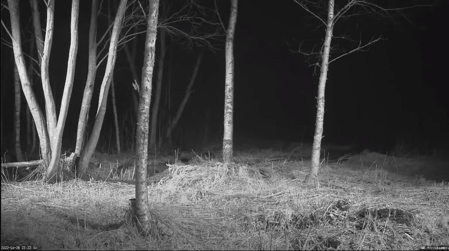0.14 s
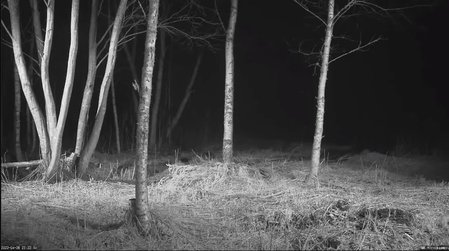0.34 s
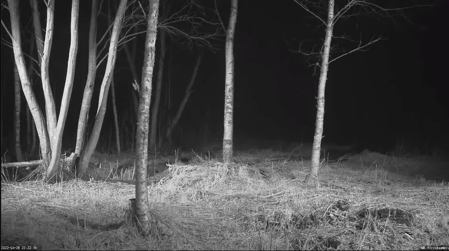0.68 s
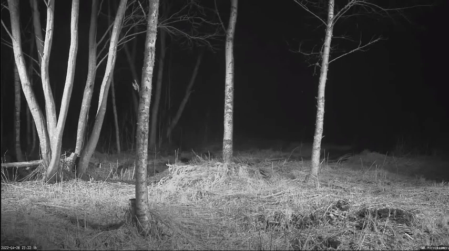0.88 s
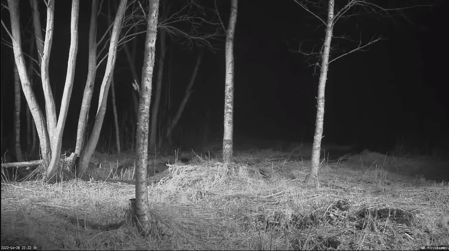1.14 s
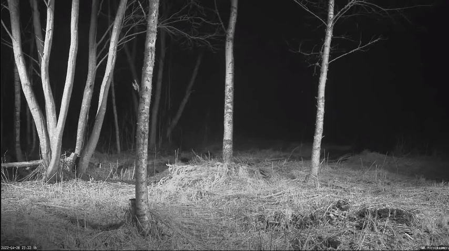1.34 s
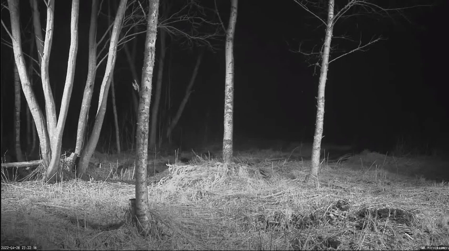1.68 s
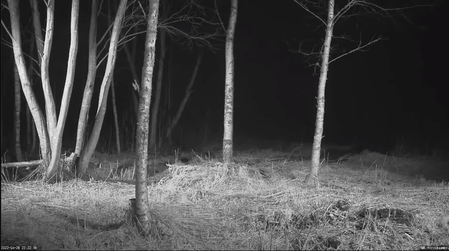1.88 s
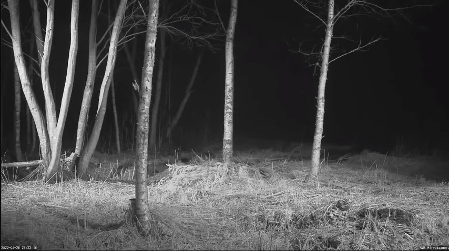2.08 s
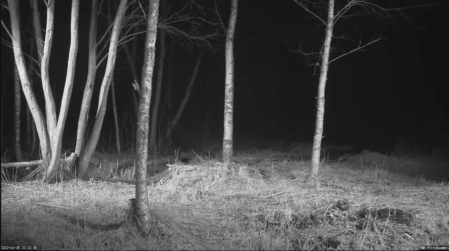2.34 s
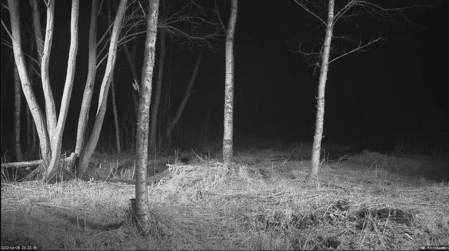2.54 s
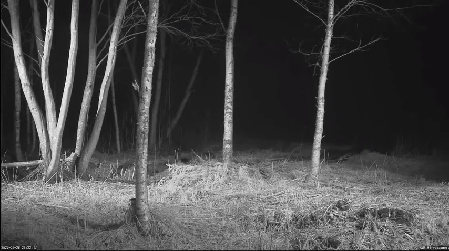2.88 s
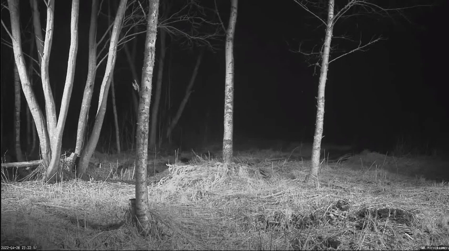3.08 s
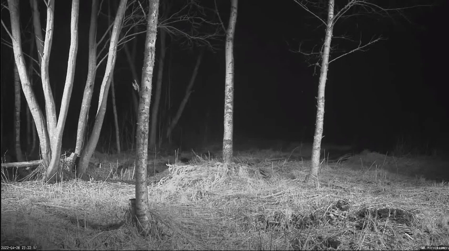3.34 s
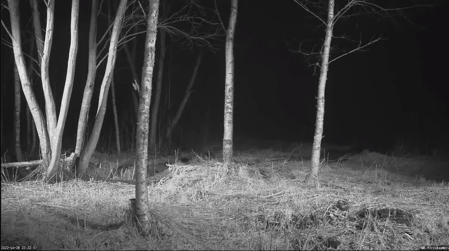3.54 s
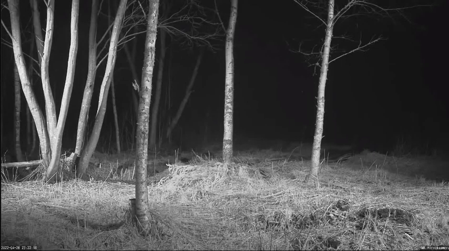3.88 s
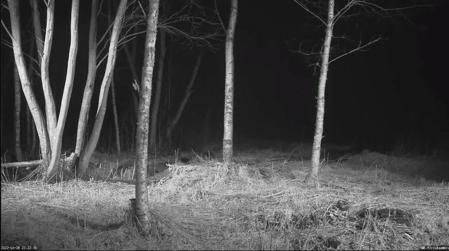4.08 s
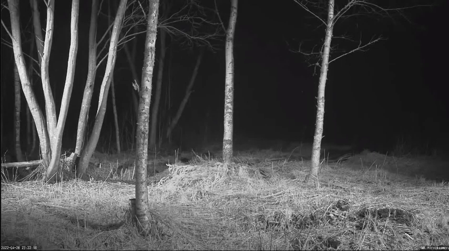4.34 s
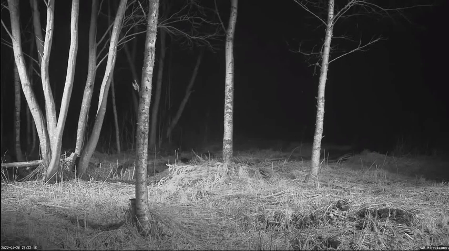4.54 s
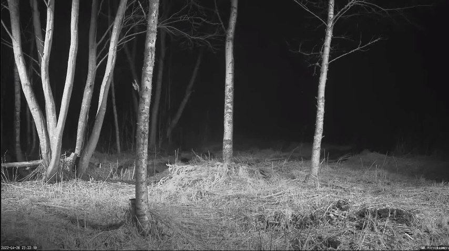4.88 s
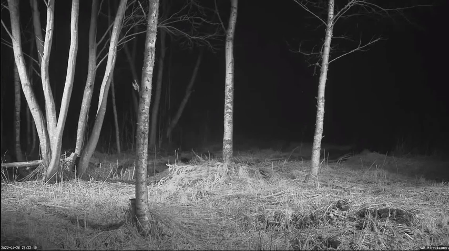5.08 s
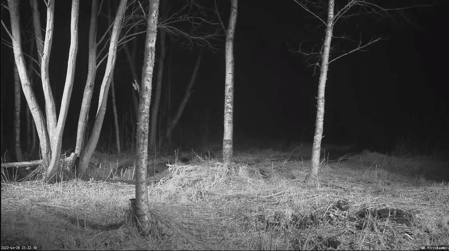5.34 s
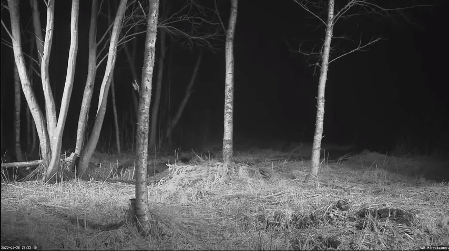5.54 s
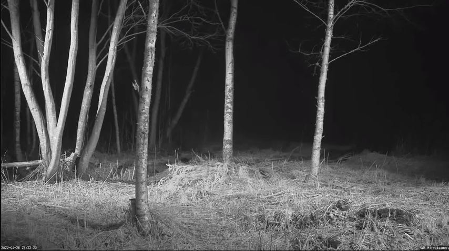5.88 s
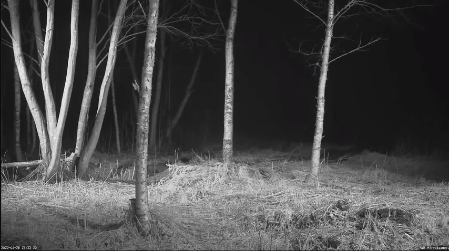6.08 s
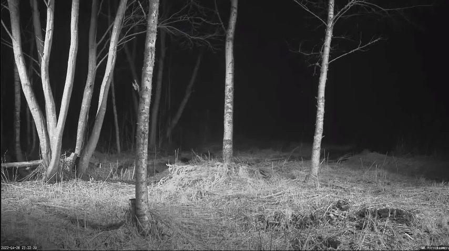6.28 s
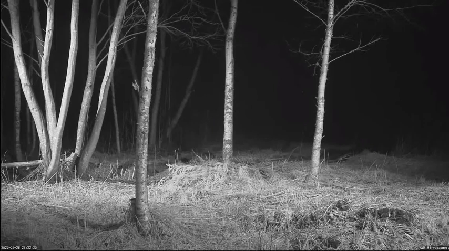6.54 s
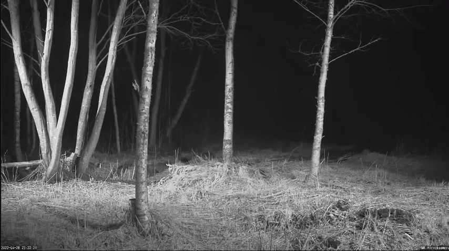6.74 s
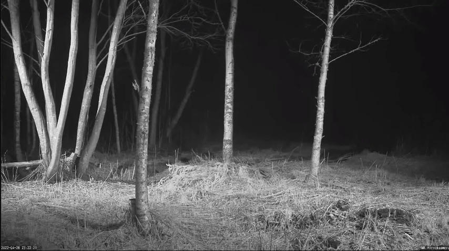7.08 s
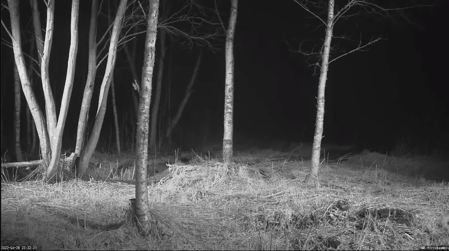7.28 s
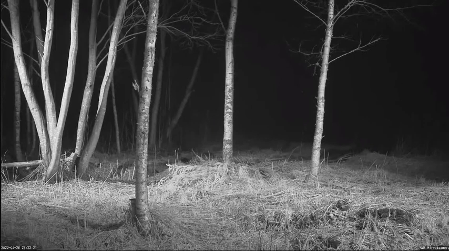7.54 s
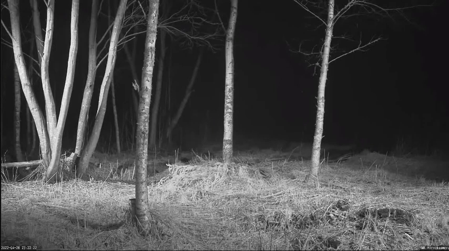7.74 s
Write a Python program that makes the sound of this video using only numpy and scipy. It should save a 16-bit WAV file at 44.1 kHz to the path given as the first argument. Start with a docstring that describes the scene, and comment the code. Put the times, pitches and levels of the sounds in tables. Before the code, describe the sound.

Already in full chorus, several wolves yip and give brief, quavering howls across dark woodland, heard from a fixed outdoor microphone at some distance. Sparse calls build to two abrupt falling squeals around three and three and a half seconds, the strongest cries. Busy yapping follows, with a bright yip past five and a half, a slight thinning, then a last flurry. Distant pack voices, breathy throat air, long woodland echo and very low hiss fill the gaps.

```python
"""A wolf pack choruses in a forest at night: yips, two falling squeals, low howls and thin whines.
Yips, squeals and howls are wavering harmonics weighted by a throat spectrum; whines are near-pure tones.
Yips, howls and whines are single pitch arches; squeals slide down in steps. Air rushes with yips and squeals.
A far part of the pack fills in with random howls. Tree trunks scatter the calls into a long echo;
a faint steady hiss lies underneath."""
import sys
import numpy as np
from scipy import signal
from scipy.fft import rfft, irfft, next_fast_len
from scipy.io import wavfile
from scipy.ndimage import uniform_filter1d, map_coordinates

SR = 44100
rng = np.random.default_rng(int(sys.argv[2]) if len(sys.argv) > 2 else 0)


def write(x):
    x = np.atleast_2d(x).T
    wavfile.write(sys.argv[1], SR, np.round(np.clip(x, -1, 1) * 32767).astype(np.int16))


N = 348831

# Steady background spectrum. Each row: frequency in Hz, relative density in dB per Hz.
HISS_SPECTRUM = [(10, -0.5), (28, 6.5), (60, -1), (120, -5.5), (250, -6), (600, -10), (1500, -46.5),
                 (3000, -27), (5000, -25.5), (8000, -27), (15500, -29.5)]
# Echo decay of the wood. Each row: frequency in Hz, time to fall 60 dB in seconds.
FOREST_DECAY = [(300, 7.7), (1000, 3.14), (2000, 1.2), (4000, 2.18), (8000, 0.43)]
# Far pack loudness. Each row: time in seconds, level in dB before the mix.
PACK_LEVELS = [(0, -26.5), (.66, -35), (1.501, -33.5), (1.902, -27), (2.309, -34.5), (2.599, -33.5),
               (3.13, -33.5), (3.44, -28.5), (3.799, -27), (3.999, -28), (4.701, -28), (5.442, -30.5),
               (5.68, -28.5), (5.99, -32), (6.41, -32.5), (6.901, -33.5), (7.55, -34), (7.91, -28.5)]
# Far pack voice colour. Each row: frequency in Hz, gain in dB.
PACK_COLOUR_DB = [(300, -21.5), (420, -17), (600, -7), (800, -7.5), (1100, 4.5), (1450, 2), (1800, -2),
                  (2200, -15), (2800, -39), (3400, -38), (4200, -35), (5500, -42)]
# Direct path of yips from wolves facing away. Each row: frequency in Hz, gain in dB.
FACING_AWAY = [(1500, 1), (2300, 1), (2900, -5), (4000, -2), (5500, -1.5)]
# Air rushing through the throat. Each row: frequency in Hz, relative density in dB per Hz.
AIR_SPECTRUM = [(1500, -30), (2400, -1), (2900, 3), (3500, -6), (4200, -6.5), (4700, -11), (6500, -17),
                (9000, -27.5)]
# Throat and microphone colour. Each row: frequency in Hz, gain in dB.
THROAT_COLOUR = [(300, -33.5), (420, -27), (500, -18.5), (650, -12), (900, 2.5), (1300, 3.5), (1600, 4.5),
                 (1900, 4), (2200, -4.5), (2450, -15.5), (2670, -16.5), (2800, -23.5), (3050, -19.5),
                 (3400, -38), (4100, -37), (4700, -45), (7000, -69)]
# Thin nasal whistles. Each row: start in seconds, length in seconds, top pitch in Hz,
# level in dB before the mix.
WHINE_NOTES = [(0.125, 0.16, 4830, -79), (1.075, 0.23, 5170, -76.5), (1.773, 0.14, 3985, -68.5),
               (2.49, 0.14, 3610, -77.5), (2.837, 0.12, 5610, -68.5), (2.944, 0.1, 5900, -72),
               (3.592, 0.053, 5890, -69), (3.683, 0.062, 4870, -71.5), (3.789, 0.065, 4000, -70),
               (5.43, 0.075, 5610, -77), (5.605, .2, 4330, -74.5), (6.306, 0.067, 3930, -74),
               (7.336, 0.023, 3970, -60), (7.565, .1, 3390, -71.5), (7.831, .08, 4330, -78)]
# Low notes of the adults. Each row: start in seconds, length in seconds, top pitch in Hz,
# level in dB before the mix, brightness in dB per octave, mouth resonance in Hz.
HOWL_NOTES = [(0, 0.3, 393.7, -38.5, -6, 800), (0, 0.32, 442, -42, -11, 890),
              (0, 0.43, 816, -42, -16, 1520), (.02, 0.52, 566, -51.5, -18, 1230),
              (0.423, .19, 468.5, -41.5, -9.5, 1050), (0.809, .12, 396.7, -41, -14, 1190),
              (.93, 0.17, 417.5, -43, -11.5, 1373), (1.17, 0.33, 415, -45, -9.5, 1280),
              (1.407, 0.12, 683, -39.5, -11.5, 1830), (1.466, 0.23, 649, -45, -11, 1300),
              (1.67, 0.34, 503.6, -38.5, -5.5, 1436), (2.031, 0.34, 530.7, -49, -15.5, 1517),
              (2.523, 0.2, 537.5, -48, -9.5, 1590), (2.719, 0.12, 561.7, -41.5, -5.5, 1500),
              (3.37, 0.081, 644, -36.5, -20.5, 1295), (3.471, 0.08, 559, -33, -2, 1140),
              (3.592, 0.052, 489, -32.5, 2.5, 980), (3.889, 0.16, 513.5, -43.5, -14, 1570),
              (3.904, 0.13, 334, -62, -27, 788), (4.054, 0.056, 655, -35.5, -17.5, 1760),
              (4.153, .17, 436.7, -39, -14, 1303), (4.371, 0.12, 471, -33.5, -5, 1760),
              (4.495, 0.089, 448.6, -40.5, -10, 1410), (5.06, 0.09, 501.8, -31, -9.5, 1570),
              (5.202, 0.08, 533.5, -30, -4, 1580), (5.339, 0.078, 516.4, -35.5, -1, 1100),
              (6.04, 0.06, 315.7, -62.5, -42, 780), (6.301, 0.081, 399.7, -41.5, -10, 1588),
              (6.717, .17, 484.7, -41.5, -7, 1570), (6.944, 0.099, 669, -42.5, 11, 1322),
              (7.682, 0.066, 487.5, -37, -2, 1415)]
# Two falling squeals, a list of rows for each. Each row: time in seconds, pitch in Hz,
# level in dB before the mix.
SQUEAL_PATHS = [
    [(2.932, 1545, -21), (2.995, 1528, -23), (3.012, 1478, -18), (3.04, 1250, -17), (3.125, 1124, -21.5),
     (3.21, 1112, -24.5), (3.265, 925, -32.5), (3.335, 871, -34), (3.375, 680, -34.5)],
    [(3.637, 1593, -24.5), (3.675, 1553, -23.5), (3.705, 1327, -17), (3.73, 958, -28), (3.757, 889, -26),
     (3.785, 783, -29.5)],
]
# Quick high cries. Each row: start in seconds, rise in seconds, fall in seconds, top pitch in Hz,
# pitch drop as a share, level in dB before the mix, brightness in dB per octave.
YIP_NOTES = [(.215, 0.0094, 0.05, 1071, 0.18, -35, -6.5), (0.26, 0.0072, .052, 852, 0.18, -39, 1.5),
             (1.23, 0.014, 0.02, 764, 0.16, -39.5, -5), (1.452, 0.01, 0.038, 867, 0.23, -43, 12),
             (1.594, 0.031, 0.044, 1297, 0.16, -33.5, 3), (1.78, 0.02, 0.024, 1218, 0.062, -35.5, -14),
             (1.808, 0.033, .033, 1323, 0.15, -34, 8), (1.815, 0.016, 0.033, 813, 0.24, -37.5, 4.5),
             (2.035, 0.02, 0.053, 808, 0.13, -35.5, 7), (3.28, 0.022, 0.021, 989, 0.03, -41, 7),
             (3.38, 0.012, 0.015, 1263, 0.053, -33, -9.5), (3.791, 0.026, 0.055, 908, 0.12, -34.5, 2.5),
             (3.815, 0.018, 0.023, 1284, 0.029, -30.5, -24), (3.865, 0.015, .06, 825.6, 0.12, -32, -5),
             (3.92, .015, 0.026, 716, .14, -33, -3), (4.73, 0.024, 0.061, 792, 0.083, -41, -3.5),
             (4.815, 0.1, 0.095, 1092, 0.044, -35, -1.5), (4.96, 0.016, 0.048, 831, 0.16, -38, -8.5),
             (5.437, 0.0039, .075, 1390, 0.037, -32, -14), (5.46, .029, 0.032, 967, .1, -37.5, -7),
             (5.576, 0.045, 0.064, 1460, .26, -25.5, -6.5), (5.68, 0.038, 0.07, 886, 0.17, -34, -0.5),
             (5.698, 0.063, 0.084, 1453, 0.099, -37, -6.5), (6.165, 0.018, 0.03, 781, 0.2, -45.5, -2),
             (6.395, 0.015, 0.021, 760, 0.24, -44, 1), (6.535, 0.0432, 0.05, 1252, 0.083, -33.5, -1.5),
             (6.606, 0.0051, .03, 871, 0.13, -42.5, 3), (6.796, .018, 0.039, 1324, 0.33, -36.5, -12),
             (6.809, .012, 0.034, 935, 0.29, -38.5, -0.5), (6.966, 0.044, 0.044, 1331, .09, -35, 5.5),
             (7.031, 0.012, .04, 856, 0.25, -35.5, 0), (7.351, 0.0029, 0.022, 1405, 0.28, -32.5, -10),
             (7.462, .027, .025, 983, 0.299, -34.5, -7), (7.566, 0.0074, 0.034, 1140, 0.13, -31.5, -14.5),
             (7.567, 0.0047, .038, 814, 0.064, -42, 0), (7.64, 0.01, 0.032, 1407, 0.28, -31, -18),
             (7.681, 0.046, 0.048, 1440, .13, -38, -8), (7.772, 0.1, 0.044, 1456, 0.15, -31.5, -3.5)]

BAND_EDGE_HZ = 15750
ECHO_BUILD_S = 0.014  # time constant for the first echoes to gather
AIR_DB, AIR_FOLLOW_POWER = -42, 0.91  # dB against rms of the cries, before the mix; power of loudness
WHINE_BEND_SHARE = 0.03  # pitch drop at both ends
HOWL_RISE_SHARE, HOWL_RISE_MAX_S = 0.431, 0.075  # the top comes early, however long the note
HOWL_BEND_SHARE, HOWL_BEND_HALVED_S = 0.1993, 0.142  # limit for short notes; half at this length
OPEN_HZ, OPEN_WIDTH_HZ = 955, 140  # below this pitch a squeal opens into a brighter voice
SQUEAL_BRIGHT_DB_PER_OCT, OPEN_GAIN_DB_PER_OCT = -12.5, 16.5  # closed voice; added by opening
YIP_RASP_SCALE, RASP_AT_HZ, RASP_POWER = 0.02, 820, 4  # jitter scale at this pitch; less above it


def amp(db):
    """Decibels to gain."""
    return 10 ** (np.asarray(db) / 20)


def evened(x):
    """Scales to rms 1."""
    return x / np.sqrt(np.mean(x ** 2) + 1e-20)


def read(points, hz):
    """Interpolates a spectrum on a log-frequency axis."""
    f, value = np.transpose(points)
    return np.interp(np.log(hz + 1), np.log(f + 1), value)


def coloured_noise(points):
    """White noise weighted by a spectrum."""
    gain = amp(read(points, np.fft.rfftfreq(N, 1 / SR)))
    return irfft(rfft(rng.standard_normal(N)) * gain, N)


def add(mix, start_s, sound):
    """Mixes a sound in at its start time."""
    part = mix[max(0, round(start_s * SR)):][:len(sound)]
    part += sound[:len(part)]


def drift(t, rate_hz, size=1024):
    """Smooth random curve through `rate_hz` independent values a second."""
    return map_coordinates(rng.standard_normal(size), [(t - t[0]) * rate_hz], mode="wrap")


def voice(t, hz, bright_db, colour, waver, rough, mouth_hz=1500, mouth_db=0, upper_db=0, width_hz=200, count=9):
    """Harmonics of wavering, jittering vocal folds, weighted by throat and one mouth resonance; about rms 1."""
    hz = hz * (1 + waver * drift(t, 44.48) + rough * drift(t, 520))
    phase = 2 * np.pi * np.cumsum(hz) / SR
    k = np.arange(1, count + 1)[:, None]
    # a positive tilt stops rising at 2700 Hz; a negative one keeps falling
    capped_db = bright_db * np.log2(np.minimum(k, 2700 / hz))
    tilt_db = np.minimum(capped_db, bright_db * np.log2(k))
    tilt_db = tilt_db + upper_db * np.log2(np.maximum(k / 2, 1))  # per octave above the second harmonic
    peak_db = mouth_db / (1 + ((k * hz - mouth_hz) / width_hz) ** 2)
    gain = amp(read(colour, k * hz) + tilt_db + peak_db) * (k * hz < SR / 4)
    harmonics = (gain * np.sin(k * phase)).sum(0)
    return np.sqrt(2) * harmonics / np.sqrt((gain ** 2).sum(0) + 1e-20)


def arch(start_s, rise_s, fall_s, top_hz, bend, edge_db=3.0, attack_s=0.015, release_s=0.0028):
    """Time, pitch and loudness of a call: a pitch parabola, lower by share `bend` at its longer end."""
    rise_s, fall_s = max(rise_s, 0.002), max(fall_s, 0.005)
    t = np.arange(-rise_s, fall_s, 1 / SR)  # counted from the top
    hz = top_hz * (1 - bend * (t / max(rise_s, fall_s)) ** 2)
    away = (t / np.where(t < 0, rise_s, fall_s)) ** 2
    gate = np.clip(np.minimum((t + rise_s) / attack_s, (fall_s - t) / release_s), 0, 1)
    return start_s + rise_s + t, hz, evened(amp(-edge_db * away) * gate)


def hiss(level_db=-61):
    """Still night air and the microphone's own noise: steady coloured noise."""
    return amp(level_db) * evened(coloured_noise(HISS_SPECTRUM))


def forest(x, early_db=6, early_s=0.04, spacing=16):
    """Trunk echoes: sparse random taps, strong early, each band decaying at its own rate; unit energy."""
    length = 2 * SR
    taps = rng.standard_normal(length) * (rng.random(length) < 1 / spacing)
    hz, t, z = signal.stft(taps, SR, nperseg=256)
    decay_db = early_db * np.exp(-t / early_s) - 60 * t / read(FOREST_DECAY, hz)[:, None]
    z *= amp(decay_db) * (1 - np.exp(-t / ECHO_BUILD_S))
    tail = signal.istft(z, SR, nperseg=256)[1]
    return signal.fftconvolve(x, tail / np.linalg.norm(tail))[:len(x)]


def far_pack(count=160, spread_db=10, effort_tilt=0.04):
    """Distant wolves: short arched howls at random, direct plus echo; slightly duller when quieter."""
    low_hz, high_hz, least_bend, more_bend = 380, 900, 0.08, 0.2
    lead = SR  # the chorus is already under way
    out = np.zeros(N + lead)
    s, level_db = np.transpose(PACK_LEVELS)
    for i, (late, rise, fall, note, droop, size) in enumerate(rng.random((count, 6))):
        start_s = (i + late) / count * len(out) / SR
        top_hz = low_hz * (high_hz / low_hz) ** note
        effort_db = np.interp(start_s - lead / SR, s, level_db) - level_db.mean()
        rise_s, fall_s = 0.035 + 0.07 * rise, 0.045 + 0.11 * fall
        t, hz, swell = arch(start_s, rise_s, fall_s, top_hz, least_bend + more_bend * droop)
        cry = voice(t, hz, effort_tilt * effort_db, PACK_COLOUR_DB, waver=0.02632, rough=0.013)
        add(out, start_s, amp(spread_db * size) * swell * cry)
    heard = (amp(-1) * out + forest(out))[lead:]
    # level out over 250 ms, then follow the level table
    heard /= np.sqrt(abs(uniform_filter1d(heard ** 2, size=SR // 4)) + 1e-12)
    return heard * amp(np.interp(np.arange(N) / SR, s, level_db))


def direct(x):
    """Straight path to the microphone, shaded by a head turned away."""
    size = next_fast_len(N + SR // 10)
    gain = amp(read(FACING_AWAY, np.fft.rfftfreq(size, 1 / SR)))
    return irfft(rfft(x, size) * gain, size)[:N]


def air(cries):
    """Throat air: coloured noise following the 10 ms loudness of the cries, growing more slowly than it."""
    loud = np.sqrt(abs(uniform_filter1d(cries ** 2, size=SR // 100)))
    rush = coloured_noise(AIR_SPECTRUM)
    return amp(AIR_DB) * np.std(cries) * evened(rush * loud ** AIR_FOLLOW_POWER)


def whines(waver=0.0065):
    """Nearly pure, fluttering whistles far above the voice."""
    out = np.zeros(N)
    for start_s, length_s, top_hz, level_db in WHINE_NOTES:
        t, hz, swell = arch(start_s, length_s / 2, length_s / 2, top_hz, WHINE_BEND_SHARE)
        phase = 2 * np.pi * np.cumsum(hz * (1 + waver * drift(t, 160))) / SR
        add(out, start_s, amp(level_db) * swell * np.sin(phase))
    return out


def howls():
    """Low, quavering notes of the adults: the longer the note, the less its pitch bends."""
    out = np.zeros(N)
    for start_s, length_s, top_hz, level_db, bright_db, mouth_hz in HOWL_NOTES:
        rise_s = min(HOWL_RISE_SHARE * length_s, HOWL_RISE_MAX_S)
        bend = HOWL_BEND_SHARE / (1 + (length_s / HOWL_BEND_HALVED_S) ** 2)
        t, hz, swell = arch(start_s, rise_s, length_s - rise_s, top_hz, bend,
                            edge_db=1, attack_s=0.022, release_s=0.035)
        cry = voice(t, hz, bright_db, THROAT_COLOUR, waver=0.011, rough=0.011, mouth_hz=mouth_hz, mouth_db=9.0)
        add(out, start_s, amp(level_db) * swell * cry)
    return out


def squeals(attack_s=0.0021):
    """A near wolf starts abruptly on a high note and slides down in steps, its voice opening as it drops."""
    out = np.zeros(N)
    for rows in SQUEAL_PATHS:
        s, *columns = np.transpose(rows)
        t = np.arange(s[0], s[-1], 1 / SR)
        hz, level_db = (np.interp(t, s, c) for c in columns)
        opened = 1 / (1 + np.exp((hz - OPEN_HZ) / OPEN_WIDTH_HZ))
        bright_db = SQUEAL_BRIGHT_DB_PER_OCT + OPEN_GAIN_DB_PER_OCT * opened
        cry = voice(t, hz, bright_db, THROAT_COLOUR, waver=0.0017, rough=0.0098, upper_db=-8)
        gate = np.minimum(np.minimum(t - t[0], t[-1] - t) / attack_s, 1)
        add(out, s[0], amp(level_db) * cry * gate)
    return out


def yips():
    """Quick arched cries; low ones are raspier, and all grow raspier as they break off."""
    out = np.zeros(N)
    for start_s, rise_s, fall_s, top_hz, bend, level_db, bright_db in YIP_NOTES:
        t, hz, swell = arch(start_s, rise_s, fall_s, top_hz, bend, edge_db=3, attack_s=0.004)
        growth = 0.16 + 2 * np.linspace(0, 1, len(t)) ** 3
        rough = YIP_RASP_SCALE * (RASP_AT_HZ / top_hz) ** RASP_POWER * growth
        cry = voice(t, hz, bright_db, THROAT_COLOUR, waver=0.0075, rough=rough,
                    mouth_hz=1620, mouth_db=3.5, upper_db=-2.5)
        add(out, start_s, amp(level_db) * swell * cry)
    return out


def scene():
    """Sums the sources; each near group has its own balance of direct sound and echo."""
    howl, yip, squeal, whine = howls(), yips(), squeals(), whines()
    rush = air(yip + squeal)
    out = hiss() + amp(-8) * far_pack()
    out += amp(-6) * rush + forest(amp(-4) * rush)
    out += amp(4.5) * whine + forest(amp(-2.0) * whine)
    out += amp(0.3) * howl + forest(amp(-5.8) * howl)
    out += amp(-0.85) * squeal + forest(amp(-6.5) * squeal)
    out += amp(1.5) * direct(yip) + forest(amp(-3.3) * yip)
    return out[None]


def record(dry):
    """Fades both ends over 3 ms, then low-passes at the recorder's band limit."""
    eased = dry * signal.windows.tukey(N, 2 * 0.003 * SR / N)
    low_pass = signal.firwin(511, BAND_EDGE_HZ, window=("kaiser", 9), fs=SR)
    return signal.oaconvolve(eased, low_pass[None], "same")


dry = scene()
out = record(dry)
write(out)
```